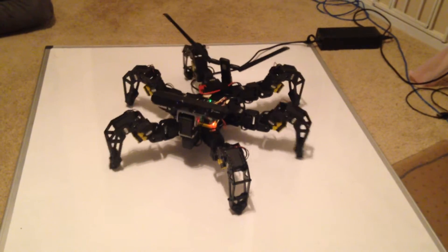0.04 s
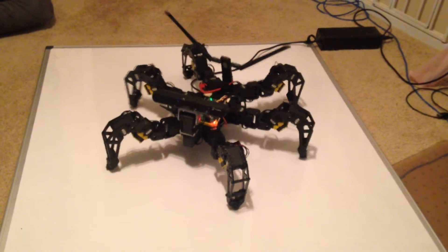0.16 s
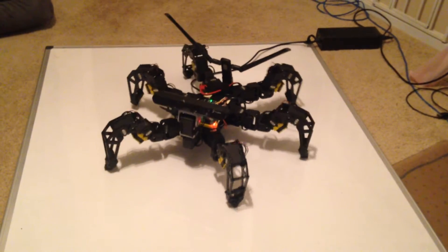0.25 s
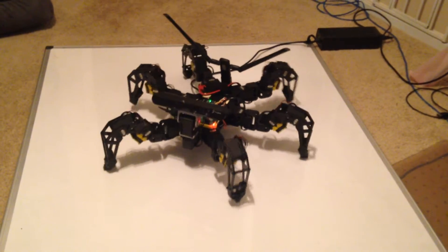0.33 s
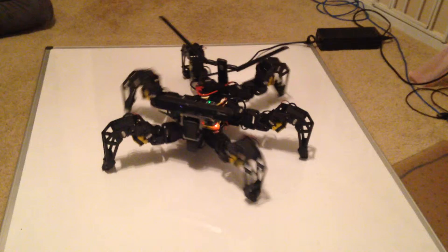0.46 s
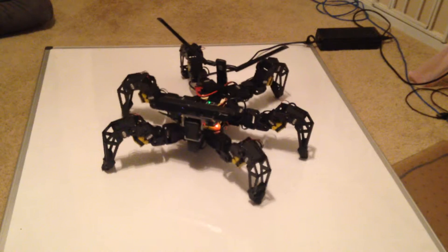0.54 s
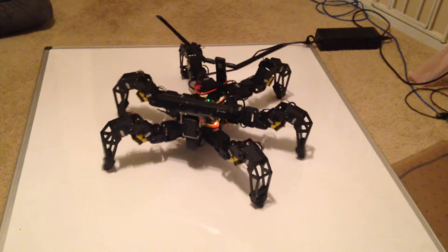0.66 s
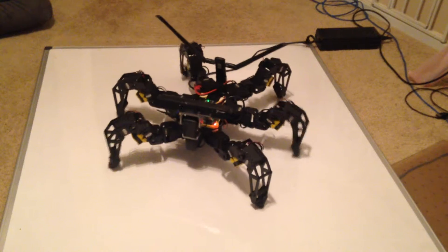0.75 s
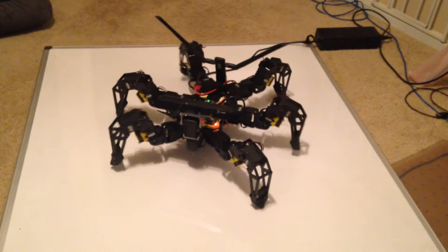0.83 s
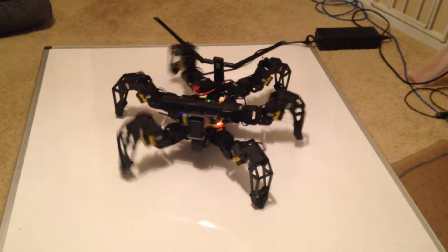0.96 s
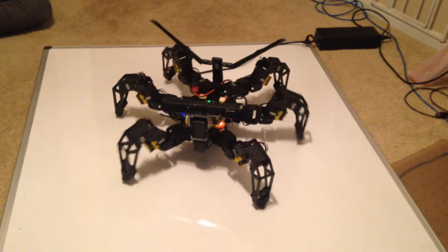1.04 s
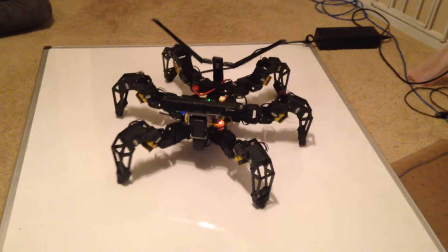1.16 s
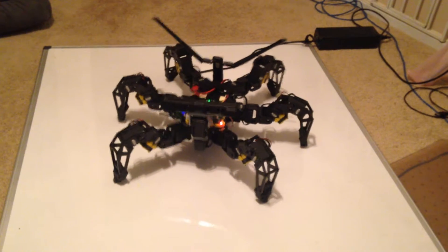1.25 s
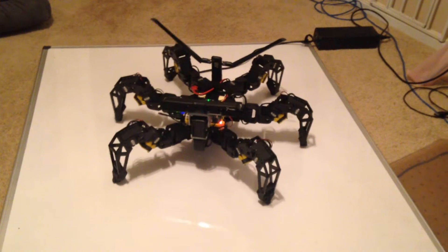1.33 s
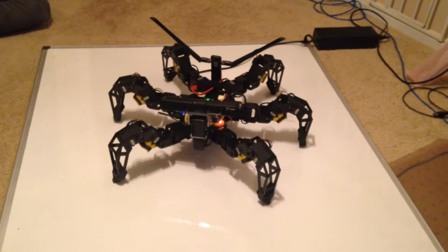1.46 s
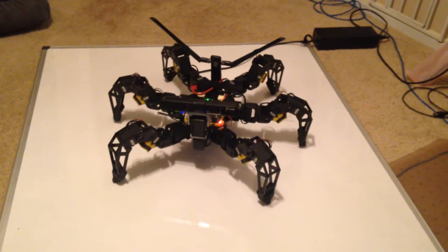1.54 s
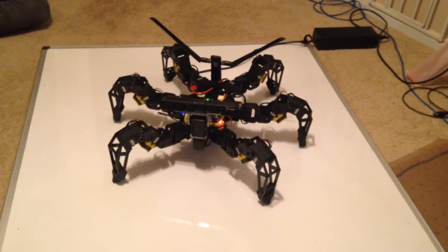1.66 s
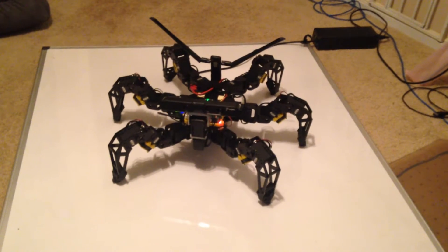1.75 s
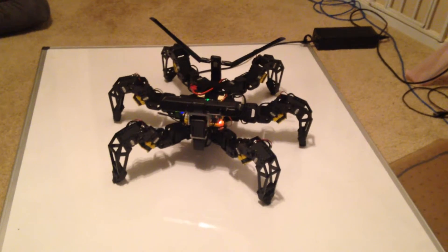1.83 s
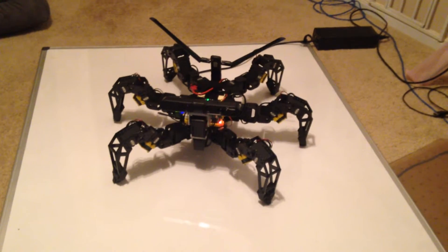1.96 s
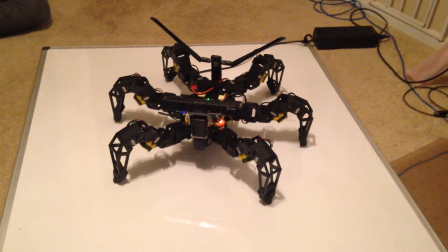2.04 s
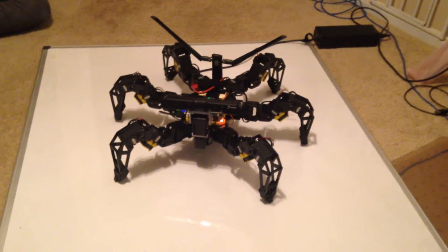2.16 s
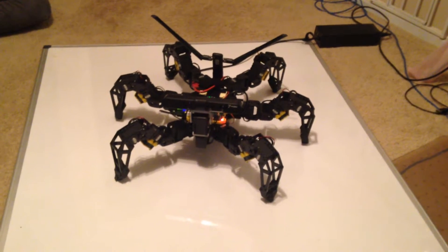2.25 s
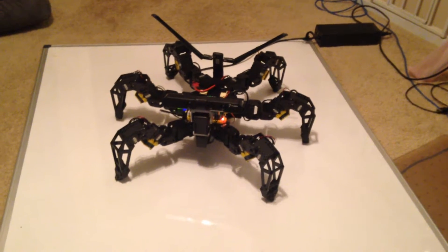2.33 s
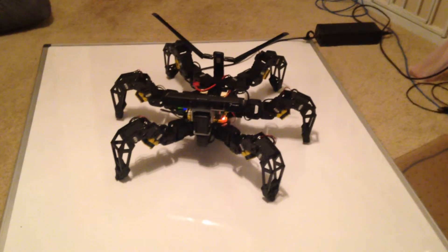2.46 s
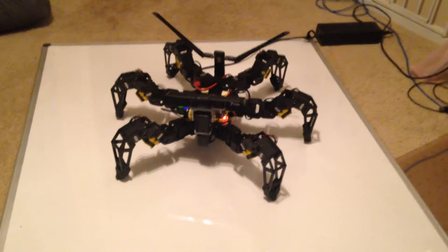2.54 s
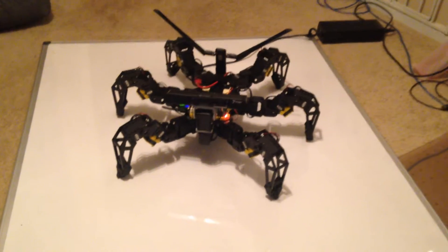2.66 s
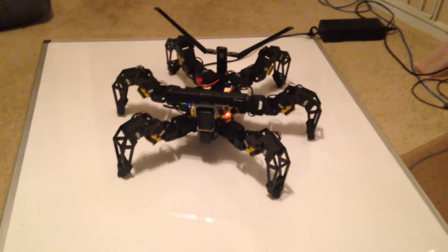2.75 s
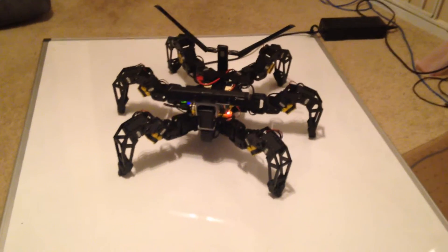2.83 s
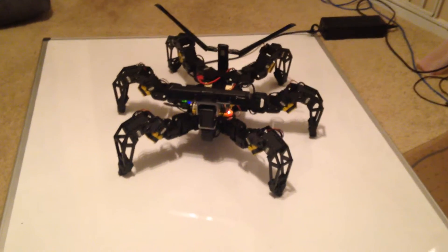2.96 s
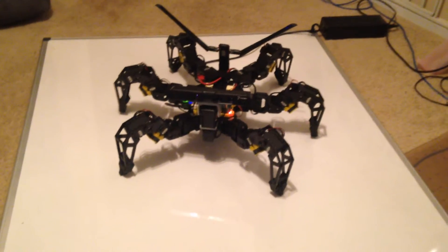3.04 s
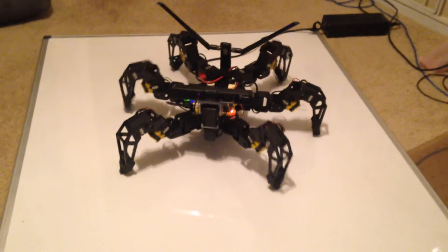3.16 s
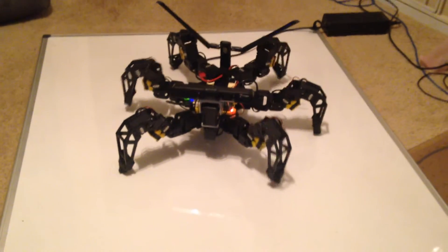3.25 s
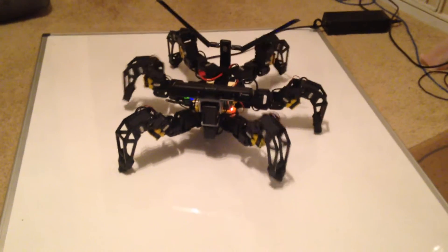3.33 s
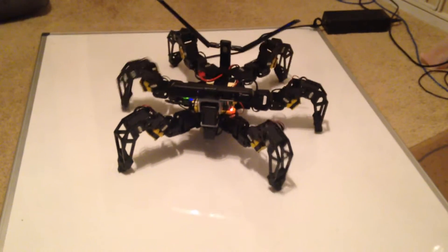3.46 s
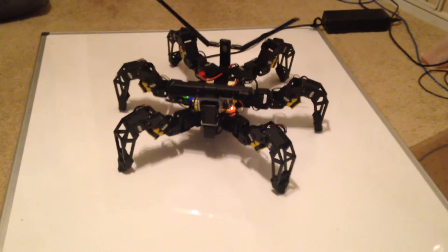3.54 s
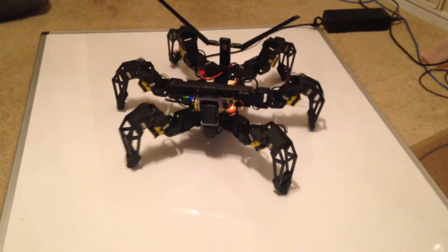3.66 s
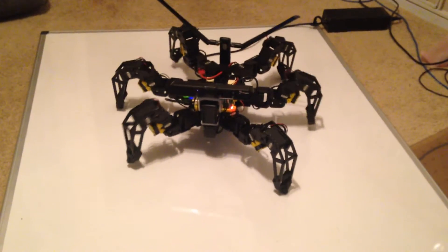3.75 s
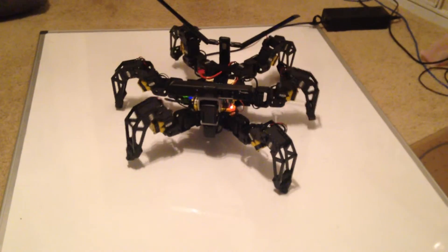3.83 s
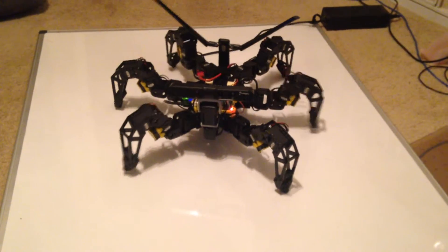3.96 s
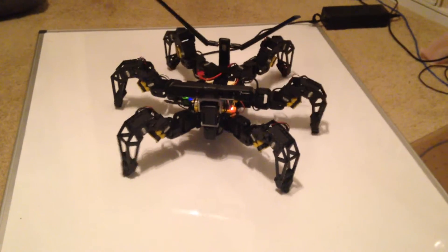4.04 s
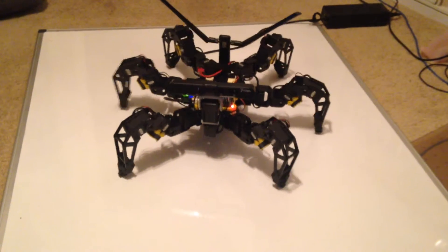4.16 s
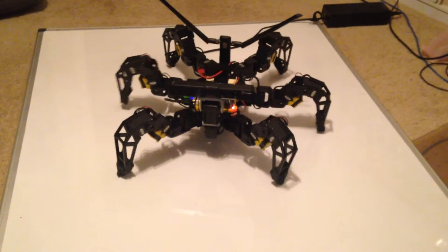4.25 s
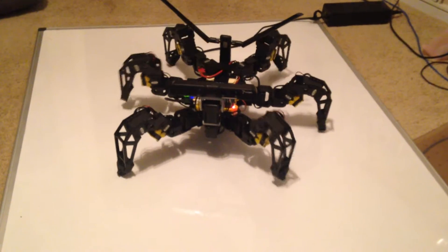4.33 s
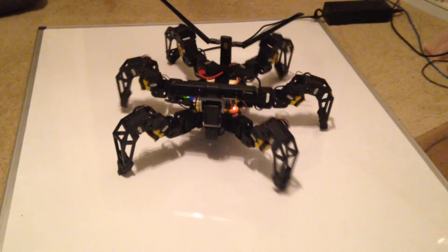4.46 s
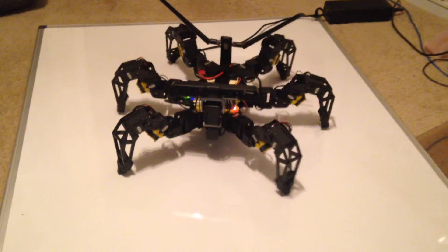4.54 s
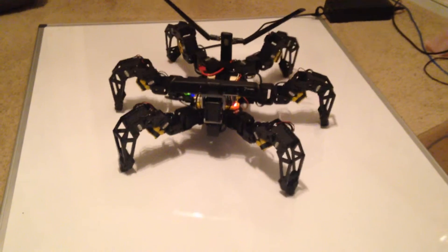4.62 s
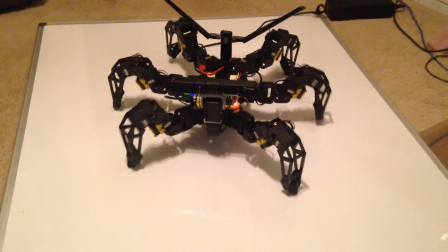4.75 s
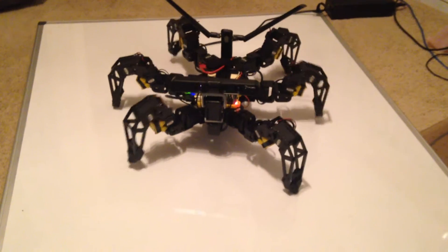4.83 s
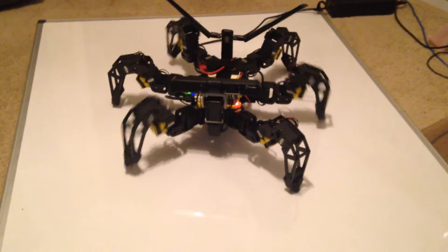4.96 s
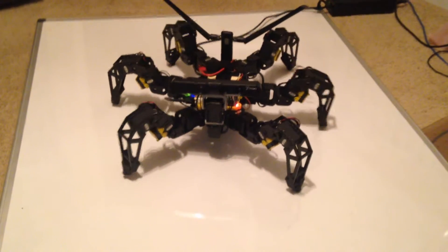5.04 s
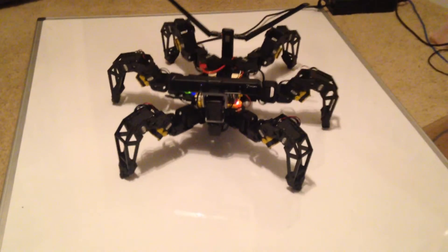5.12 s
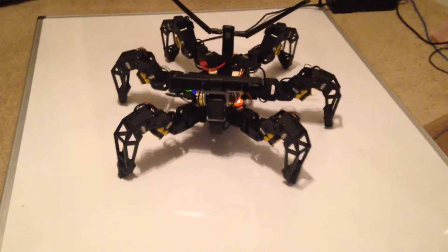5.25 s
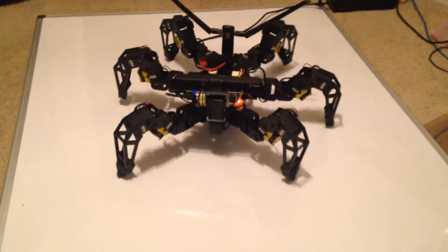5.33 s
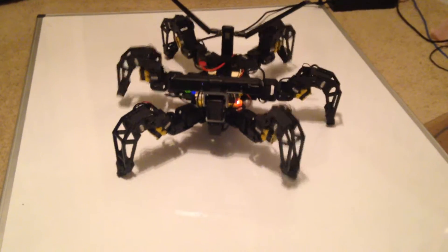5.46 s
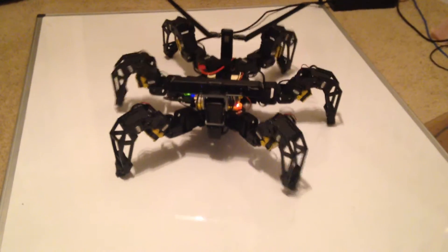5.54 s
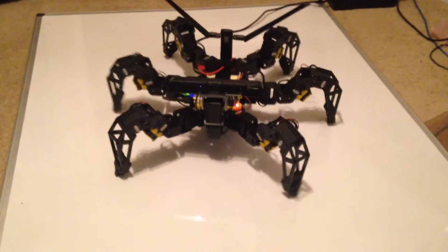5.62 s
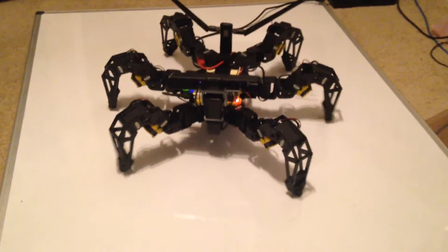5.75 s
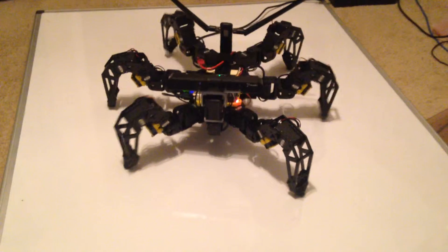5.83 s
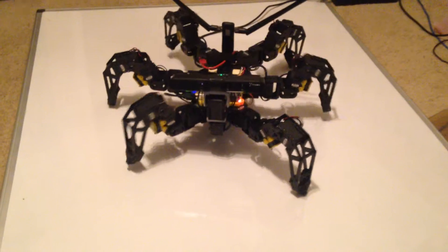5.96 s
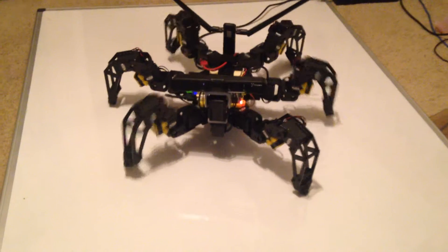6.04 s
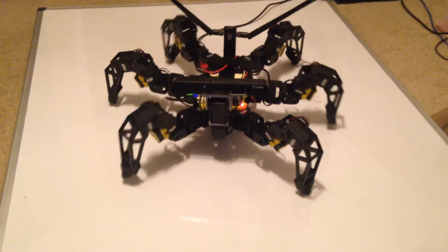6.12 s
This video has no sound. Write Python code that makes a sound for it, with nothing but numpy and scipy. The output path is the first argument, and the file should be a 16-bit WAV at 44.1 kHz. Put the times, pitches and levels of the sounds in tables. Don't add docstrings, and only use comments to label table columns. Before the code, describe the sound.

Servo motors hum, hiss and sing thinly throughout while a legged robot walks on a thin board laid on carpet. Clusters of dull, woody footfalls with plastic clicks and rattles come early, stop for a buzzing pause with a faint sinking drone, then return about every half second with brief stuttering toe scrapes. Small microphone nearby, little deep bass, short room echo.

```python
import sys
import numpy as np
from scipy import signal
from scipy.io import wavfile

SR = 44100
rng = np.random.default_rng(int(sys.argv[2]) if len(sys.argv) > 2 else 0)


def int16_out(signal):
    q = np.round(np.clip(np.atleast_2d(signal).T, -1, 1) * 32767)
    wavfile.write(sys.argv[1], SR, q.astype(np.int16))


def voltage_ratio(decibels):
    exponent = np.asarray(decibels, float) / 20
    return 10 ** exponent


N = 272962


def rms_one(x):
    return x / np.sqrt(np.mean(x ** 2) + 1e-20)


def in_time(rows):
    s, *columns = np.transpose(rows)
    return [np.interp(np.arange(N) / SR, s, column) for column in columns]


def drift(rate):
    r = np.exp(-80 * np.pi * rate / SR)
    white = rng.standard_normal(N // 40 + 2002)
    slow = signal.lfilter([1], [1, -2 * r, r * r], white)[2000:]
    return np.interp(np.arange(N) / 40, np.arange(len(slow)), rms_one(slow))


def highpass(x, order, hz):
    return signal.sosfilt(signal.butter(order, hz, "high", fs=SR, output="sos"), x)


def resonance(x, hz, width_hz):
    r = np.exp(-np.pi * width_hz / SR)
    top = np.array([1, 0, -1]) * (1 - r * r) / 2
    bottom = [1, -2 * r * np.cos(2 * np.pi * hz / SR), r * r]
    return signal.lfilter(top, bottom, x)


def hiss(spectrum, patchy_db, grain_db):
    hz, level_db = np.transpose(spectrum)
    band_count = round(4 * np.log2(hz[-1] / hz[0]))
    edges = np.geomspace(hz[0], hz[-1], band_count + 1)
    white = rng.standard_normal((2, N)) * voltage_ratio(grain_db * drift(230))
    out = np.zeros(N)
    for k, (low, high) in enumerate(zip(edges, edges[1:])):
        band = signal.sosfilt(signal.butter(2, [low, high], "band", fs=SR, output="sos"), white[k % 2])
        band_db = np.interp(np.log(low * high) / 2, np.log(hz), level_db)
        out += band * voltage_ratio(band_db + patchy_db * drift(27))
    return rms_one(out)


def rings(table, t60_s, rise_s):
    out, t = np.zeros(N + SR), np.arange(SR // 10) / SR
    for s, peak_db, hz in table:
        at = round(s * SR)
        envelope = voltage_ratio(peak_db - 60 * t / t60_s) * (1 - np.exp(-t / rise_s))
        out[at:at + len(t)] += envelope * np.sin(2 * np.pi * hz * t)
    return out[:N]


# pitch_hz, level_db (per Hz)
IDLE_COLOR = [(30, -25), (90, 1), (150, -8.5), (290, -17.5), (900, -14.5), (1500, -14.5), (2600, -14),
              (3500, -6.5), (4400, -11.5), (5700, -24.5), (7200, -21), (10500, -33), (13000, -45),
              (15800, -21)]


def servo_hiss():
    return voltage_ratio(-49 - 2.5) * hiss(IDLE_COLOR, patchy_db=0.64, grain_db=-0.84)


# time_s, pitch_hz, level_db (rms)
MOTOR_TONES = [
    [(0, 1066, -65), (1.0, 1060, -63), (2.2, 1076, -64), (3.2, 1074, -61), (4, 1070, -65), (4.6, 1062, -67),
     (5.5, 1058, -63), (6.19, 1054, -65)],
    [(0, 1116, -72), (1.0, 1113, -68), (1.8, 1123, -63), (2.7, 1105, -64), (3.4, 1098, -63),
     (4.0, 1108, -66), (4.7, 1118, -65), (6.19, 1114, -71)],
    [(0, 1192, -72), (1.2, 1193, -72), (1.5, 1194, -64.5), (3.1, 1194, -64), (3.5, 1190, -68),
     (4.5, 1191, -69), (6.19, 1192, -63)],
    [(0, 960, -80), (1.2, 962, -70), (1.9, 970, -84), (2.7, 986, -70), (3.3, 993, -65), (3.8, 986, -68),
     (4.1, 975, -80), (5, 968, -69), (6.19, 966, -67)],
    [(0, 1085, -82), (2.3, 1088, -80), (3.0, 1088, -66), (4.3, 1085, -72), (5.2, 1086, -67),
     (6.19, 1082, -72)],
]
OCTAVE_DB = [-4.5, -13, -5.5, -19, -5]


def whines():
    out = np.zeros(N)
    for rows, over_db in zip(MOTOR_TONES, OCTAVE_DB):
        hz, level_db = in_time(rows)
        phase = 2 * np.pi * np.cumsum(hz + 1.5 * drift(8)) / SR
        wobble_db = 1.8 * drift(7)
        tone = np.sin(phase) + voltage_ratio(over_db) * np.sin(2 * phase)
        out += np.sqrt(2) * voltage_ratio(level_db + wobble_db) * tone
    return voltage_ratio(0.36) * out


# pitch_hz, unsteadiness_hz, level_db (rms)
SERVO_BUZZ = [(82.6, 5.3, -63), (194, 1.02, -61.5), (238.5, 1.56, -61.5), (388, 1.86, -68),
              (432, 2.12, -69.5), (444, 3.82, -69), (925, 3.4, -100)]
# pitch_hz, unsteadiness_hz, level_db (rms)
BEATING_PAIR = [(215.2, .3, -54.5), (222.3, .3, -55.5)]
# time_s, level_db
HOLDING_EFFORT = [(0, -6), (0.6, -8), (0.9, -6), (1.02, -14), (1.14, -5), (1.24, -6), (1.3, -1), (1.7, -4),
                  (2.0, -2.5), (2.5, -2), (2.9, -3), (3.28, -1.5), (3.34, -7), (4.0, -6), (4.5, -7),
                  (5.0, -8), (5.6, -8), (6.19, -4.5)]
IN_STEP_S, CLOSING_HZ_PER_S = 2.47, .9


def buzz():
    out = np.zeros(N)
    sink_hz = CLOSING_HZ_PER_S * np.clip(np.arange(N) / SR - IN_STEP_S, -1, 1)
    upper_hz = BEATING_PAIR[1][0]
    for hz, wander_hz, level_db in SERVO_BUZZ + BEATING_PAIR:
        gain = np.sqrt(2) * voltage_ratio(level_db + 1.5 * drift(8))
        rate = hz - sink_hz * (hz == upper_hz) + wander_hz * drift(4.63)
        turns = np.cumsum(rate) / SR
        out += gain * np.sin(2 * np.pi * (turns - turns[round(IN_STEP_S * SR)]))
    return voltage_ratio(in_time(HOLDING_EFFORT)[0]) * out


def rumble():
    dull = rms_one(resonance(resonance(rng.standard_normal(N), 62, 40), 62, 40))
    return voltage_ratio(-65.5 + 0.5 * drift(2.9)) * dull


# time_s, pitch_hz, level_db (rms)
FAR_ENGINE = [
    (0, 90, -83),
    (1.3, 121, -78),
    (1.55, 120.9, -57),
    (1.76, 108, -59),
    (1.92, 99.7, -63),
    (2.03, 88, -60),
    (2.39, 86.2, -62),
    (2.46, 86.8, -75),
    (6.19, 85, -80),
]


def drone():
    hz, level_db = in_time(FAR_ENGINE)
    return np.sqrt(2) * voltage_ratio(level_db) * np.sin(2 * np.pi * np.cumsum(hz) / SR)


# middle_s, effort_db, half_length_s, drive_whine_db (above effort)
LEG_STROKES = [(0.075, -51, 0.065, 1.5), (0.184, -49.5, 0.048, 0), (0.31, -51, 0.049, 3),
               (0.48, -52.5, 0.061, 3.5), (0.624, -49.5, 0.046, 1), (0.718, -49, 0.055, 0.5),
               (0.871, -49, 0.053, 2), (1.018, -53.5, 0.097, 4.5), (1.125, -49.5, 0.055, 0),
               (1.26, -48.5, 0.088, -6), (1.373, -51.5, 0.023, 5.5), (1.47, -50.5, 0.038, -1),
               (3.28, -49.5, 0.029, 3), (3.367, -54.5, 0.087, 1.5), (3.517, -51, 0.049, 3),
               (3.628, -47, 0.04, -2), (3.8, -49, 0.075, 2), (4.089, -51, 0.11, 2), (4.163, -50, 0.027, -2),
               (4.298, -53, 0.039, 9), (4.453, -53.5, 0.056, 4), (4.567, -51, 0.045, 2),
               (4.671, -48, 0.046, -0.5), (4.845, -50.5, 0.1, 0.5), (5.113, -50, 0.065, 1.5),
               (5.221, -47.5, 0.055, -1.5), (5.37, -49, 0.035, 5), (5.516, -53, 0.079, 4),
               (5.718, -51.5, 0.088, -1), (5.94, -49, 0.027, 5.5)]
FINAL_STROKE = (6.5, -48.5, 0.56, -0.5)
REST_WHIR_DB, REST_DRIVE_DB = -58, -58


def effort():
    t = np.arange(N) / SR
    whir, drive = voltage_ratio(REST_WHIR_DB) ** 2, voltage_ratio(REST_DRIVE_DB) ** 2
    for s, effort_db, half_s, whine_db in LEG_STROKES + [FINAL_STROKE]:
        power = voltage_ratio(effort_db) ** 2 * np.exp(-((t - s) / half_s) ** 2)
        whir = whir + power
        drive = drive + power * voltage_ratio(whine_db) ** 2
    return np.sqrt(whir), np.sqrt(drive)


# pitch_hz, level_db (per Hz)
GEAR_COLOR = [(1500, -6.5), (2500, -2.5), (3500, 1), (5200, -4), (7200, -0.5), (10000, -8), (12000, -4),
              (16000, -23)]
# pitch_hz, level_db (per Hz)
DRIVE_COLOR = [(9000, -39), (11500, -40), (13000, -11.5), (14500, 8), (15500, 21), (16500, -3)]


def leg_swings():
    whir, drive = effort()
    gears = whir * hiss(GEAR_COLOR, patchy_db=1.0, grain_db=1.5)
    return gears + drive * hiss(DRIVE_COLOR, patchy_db=3.0, grain_db=1.5)


# start_s, peak_db, treble_db
JOINT_TICKS = [(0.0743, -34, -1), (0.1586, -42, -9), (0.595, -40, -7), (0.6802, -33.5, -17),
               (0.717, -36, -21), (1.037, -42, -9), (1.13, -38.5, 8), (1.216, -42, 6), (1.2672, -29.5, -14),
               (1.255, -44, 2), (1.554, -46, -18), (0.114, -46, 2), (3.249, -43, -7), (3.5562, -39, -9),
               (3.6125, -32.5, -16), (3.7655, -39, -15), (3.888, -42, 1), (4.064, -38.5, -13),
               (4.104, -39, -2), (4.1488, -27.5, -24), (4.6622, -33.5, -19), (4.782, -53, -14),
               (4.807, -41, -16), (5.1235, -38, -13), (5.2046, -29.5, -20), (5.3332, -44, -9),
               (5.448, -50, -16), (5.7618, -41, -12), (5.754, -42, -16), (5.945, -40, 1)]
# pitch_hz, width_hz, level_db
TOE_SHELL = [(2140, 910, -6), (3540, 1450, 1), (6560, 970, -2.5), (9400, 7200, -14)]


def ticks():
    low, top, t = np.zeros(N + SR), np.zeros(N + SR), np.arange(SR // 20) / SR
    for s, peak_db, top_db in JOINT_TICKS:
        fade = voltage_ratio(-60 * t / .013) + voltage_ratio(-13 - 60 * t / .05)
        crack = voltage_ratio(peak_db) * fade * rng.standard_normal((2, len(t)))
        at = round(s * SR)
        low[at:at + len(t)] += crack[0]
        top[at:at + len(t)] += crack[1] * voltage_ratio(top_db)
    shell = sum(voltage_ratio(level_db) * resonance(low, hz, width_hz) for hz, width_hz, level_db in TOE_SHELL)
    return (voltage_ratio(3.5) * shell + voltage_ratio(-0.5) * resonance(top, 10800, 6000))[:N]


NUDGE_TIMES = [0.143, 0.205, 0.745, 0.772, 0.836, 1.2, 1.215, 1.225, 1.355, 1.49, 3.246, 3.25, 3.262, 3.272,
               3.29, 3.292, 3.312, 3.527, 3.618, 3.722, 4.136, 4.176, 4.27, 4.305, 4.645, 4.76, 5.338,
               5.345, 5.35, 5.372, 5.41, 5.77, 5.83, 5.898]
# peak_db, pitch_hz
NUDGE_SOUNDS = [(-32, 130), (-38, 600), (-40, 265), (-44, 170), (-33, 240), (-37, 130), (-28, 105),
                (-29, 275), (-40, 130), (-43, 224), (-44, 760), (-46, 590), (-33, 150), (-34, 297),
                (-48, 650), (-32, 306), (-39, 310), (-44, 150), (-27, 204), (-42, 195), (-31, 150),
                (-29, 263), (-34, 198), (-42, 220), (-38, 170), (-47, 440), (-34, 196), (-36, 400),
                (-41, 620), (-34, 170), (-44, 286), (-29, 145), (-45, 150), (-37, 207)]


def nudges():
    return rings(np.column_stack([NUDGE_TIMES, NUDGE_SOUNDS]), t60_s=0.07, rise_s=0.0024)


# start_s, peak_db, flex_hz, boom_db, knock_db
FOOT_LANDINGS = [(0.152, -13, 176, -10, -6), (0.168, -19, 162, -16, -2.5), (0.6163, -13.5, 186, -13, -6.5),
                 (0.627, -40, 153, -13, 10), (0.676, -19, 163, -14, -19), (0.705, -18, 244, -22, -28),
                 (1.209, -13.5, 174, -7, -5.5), (1.223, -24.5, 151, -6, -5), (1.262, -18.5, 188, -17, -13),
                 (3.534, -19, 137, -11, -1.5), (3.6085, -12.5, 190, -9.5, -5.5),
                 (4.144, -8, 174, -16, -11.5), (4.149, -12.5, 210, -9, -16), (4.614, -30.5, 218, -12, -8),
                 (4.6538, -17, 197, -12.5, -18), (4.659, -17, 200, -23, -18), (5.191, -27.5, 210, -10, -4),
                 (5.201, -22, 195, -19, -4.5), (5.219, -15.5, 142, -12.5, -13),
                 (5.726, -29, 214, -8.5, -19), (5.751, -24.5, 160, -15, -2)]
# start_s, peak_db, flex_hz, boom_db
FOOT_REBOUNDS = [(0.199, -25, 244, -16), (0.278, -26, 188, -26), (0.643, -24, 304, -25),
                 (0.657, -21, 183, -30), (0.741, -34, 194, -25), (0.773, -33, 151, -21),
                 (0.834, -43, 230, -15), (1.23, -24, 149, -19), (1.357, -40.5, 151, -0.5),
                 (1.488, -37, 220, -15), (1.558, -45.5, 220, -1), (3.641, -21, 195, -15),
                 (3.755, -35.5, 213, -32), (4.178, -28, 203, -2), (4.197, -32, 181, -15),
                 (4.309, -31, 200, -30), (4.671, -21.5, 161, -14), (4.687, -28, 200, -17),
                 (4.827, -38.5, 215, -9), (5.251, -26, 170, -13), (5.373, -28.5, 179, -16),
                 (5.613, -39.5, 194, -12), (5.742, -26.5, 168, -8), (5.769, -30, 140, -17),
                 (5.828, -35, 150, -18), (5.895, -40, 203, -23), (0.181, -22, 170, -22),
                 (0.214, -24, 180, -19), (0.294, -28.5, 150, -24), (0.714, -24.5, 234, -32),
                 (1.2432, -24, 149, -22), (1.284, -37, 150, -11), (4.175, -28, 150, -15),
                 (4.696, -40, 190, -19), (5.762, -31.5, 150, -7), (0.689, -21.5, 146, -17),
                 (4.192, -29, 150, -9), (1.272, -26.5, 192, -10)]
REBOUND_KNOCK_DB, DULLING = -15.5, 0.45
SNAP_DB, SNAP_FOLLOWS, SNAP_HARD = -18, 0.24, 0.049


def strikes():
    rows = list(FOOT_LANDINGS)
    for row in FOOT_REBOUNDS:
        rows.append((*row, REBOUND_KNOCK_DB + DULLING * (row[1] + 24)))
    return [(*row, SNAP_DB + SNAP_FOLLOWS * row[-1] + SNAP_HARD * (row[1] + 16)) for row in rows]


def modes(table, t):
    hz, level_db, t60 = np.transpose(table)[:, :, None]
    luck = rng.standard_normal((2, len(table), 1))
    strength_db, detune = 2.5 * luck[0], .02 * luck[1]
    fade = voltage_ratio(level_db + strength_db - 60 * t / t60)
    return np.sum(fade * np.sin(2 * np.pi * hz * (1 + detune) * t), axis=0)


def crowded(outline, count):
    hz, level_db, t60 = np.transpose(outline)
    place = (np.arange(count) + rng.random(count)) / count
    at = np.log(hz[0]) + np.log(hz[-1] / hz[0]) * place
    levels = np.interp(at, np.log(hz), level_db)
    return np.transpose([np.exp(at), levels, np.interp(at, np.log(hz), t60)])


# pitch_hz, level_db, t60_s
BOARD_BOOM = [(62.4, -39.5, 0.17), (106, -21, 0.13), (118.4, 10.5, 0.27), (134.8, 9, 0.19)]
# pitch_hz, level_db, t60_s
BOARD_BODY = [(161, 3.5, 0.054), (183, 6.5, 0.09), (208.5, -30, 0.067), (231, 7.5, 0.17), (307, 1.5, 0.21)]
# pitch_hz, level_db, t60_s
KNOCK_OUTLINE = [(277.9, 7, 0.15), (397, 0.5, 0.17), (516, 6.5, 0.096), (1006.5, -18.5, 0.36)]
# pitch_hz, level_db, t60_s
SNAP_OUTLINE = [(820, -3, 0.16), (1100, 18.5, 0.013), (1430, -4, 0.14), (2010, -4, 0.22),
                (2818, -22, 0.095)]
BLOW_DELAY_S = .0035
CLAMP_S = .055


def footfalls():
    out, t = np.zeros(N + SR), np.arange(SR // 3) / SR
    for s, peak_db, flex_hz, boom_db, knock_db, snap_db in strikes():
        slowness_db = np.clip(-.6 * (peak_db + 20) - .4 * min(knock_db + 14, 0), 0, 16)
        rise_s = .0009 * voltage_ratio(slowness_db)
        rise = 1 - np.exp(-t / rise_s)
        turns = flex_hz * t + .4 * (1 - np.exp(-t / .0011))
        flex = np.sin(2 * np.pi * turns - np.pi) * rise * np.exp(-(t / 0.0096) ** 2)
        swell = (1 - np.exp(-t / 0.0015)) * np.exp(-(t / CLAMP_S) ** 2)
        ring = voltage_ratio(-19) * modes(BOARD_BODY, t) + voltage_ratio(boom_db - 8.0) * modes(BOARD_BOOM, t)
        knock = voltage_ratio(knock_db - 21.0) * modes(crowded(KNOCK_OUTLINE, count=20), t) * rise
        wave_front = -np.sin(2 * np.pi * 410 * t) * np.exp(-(t / 0.0023) ** 2)
        knock += voltage_ratio(knock_db + 4.0) * wave_front
        snap = voltage_ratio(snap_db - 19.5) * modes(crowded(SNAP_OUTLINE, count=16), t)
        snap *= 1 - np.exp(-2 * t / rise_s)
        at = round((s + BLOW_DELAY_S) * SR)
        out[at:at + len(t)] += voltage_ratio(peak_db) * (voltage_ratio(-2.5) * flex + swell * ring + knock + snap)
    return highpass(out[:N], 2, 75)


RATTLE_DB, RATTLE_FOLLOWS, RATTLE_T60_S = -26.5, 0.38, 0.12


def rattle():
    envelope, t = np.zeros(N + SR), np.arange(SR // 4) / SR
    for s, peak_db, flex_hz, boom_db, knock_db in FOOT_LANDINGS:
        at = round((s + BLOW_DELAY_S) * SR)
        start_db = peak_db + RATTLE_DB + RATTLE_FOLLOWS * knock_db
        envelope[at:at + len(t)] += voltage_ratio(start_db - 60 * t / RATTLE_T60_S)
    return envelope[:N] * rms_one(resonance(rng.standard_normal(N), 900, 1730))


# start_s, peak_db, pitch_hz
LEG_CLACKS = [(0.157, -39, 900), (0.159, -33, 694), (0.171, -38, 1505), (0.622, -28.5, 940),
              (1.265, -40, 950), (3.538, -48, 590), (3.536, -34, 990), (3.613, -41, 980),
              (4.147, -26, 1160), (4.151, -25.5, 898), (4.153, -30, 1330), (4.159, -36, 1950),
              (4.661, -42, 980), (5.755, -39, 1050), (3.537, -43, 1700), (3.538, -51, 2300),
              (3.613, -39, 1645), (3.612, -48, 2270), (4.149, -36, 2300), (4.15, -37, 1600),
              (5.755, -42, 1500), (5.76, -48, 1890), (5.205, -35, 720), (3.233, -31, 343),
              (0.168, -36, 640), (0.196, -37, 620), (1.212, -45, 1780), (0.712, -39, 1050),
              (5.761, -40, 1150), (5.762, -43, 1500), (4.168, -40, 1900), (4.16, -34, 620),
              (0.175, -40, 980), (1.222, -42, 1300), (5.222, -38, 380), (0.71, -40, 540),
              (5.7535, -36, 620)]


def leg_rings():
    return rings(LEG_CLACKS, t60_s=0.042, rise_s=0.0012)


# start_s, peak_db, pitch_hz
HOUSE_BUMPS = [(0.29, -40, 70), (0.897, -39, 76), (1.1, -38, 57.7), (1.92, -38, 62), (2.68, -40, 60),
               (2.928, -35, 65.5), (3.27, -40, 66), (3.899, -64, 51.1), (4.892, -39, 78),
               (5.079, -49, 73.3), (5.33, -44, 65), (5.893, -33, 67.4)]


def thuds():
    out, t = np.zeros(N + SR), np.arange(SR // 3) / SR
    for s, peak_db, hz in HOUSE_BUMPS:
        at = round(s * SR)
        swell = t / 0.036 * np.exp(-t / 0.012)
        out[at:at + len(t)] += voltage_ratio(peak_db + 9.5) * swell * np.sin(2 * np.pi * hz * t)
    return out[:N]


# strongest_s, level_db (rms), slips_hz (settled), fade_s, richness_db (multiples)
TOE_SLIDES = [
    (0.342, -33.5, 122, 0.057, -0.5),
    (4.331, -44, 121, 0.074, -9),
    (4.809, -41, 226, 0.026, -20),
    (5.357, -28.5, 128, 0.024, -3.5),
    (5.429, -43.5, 129, 0.074, 2),
]
TOE_SKIDS = [
    (3.251, -26, 146.6, 0.035, 2),
    (4.283, -33, 133.7, 0.0267, 0),
]
SECOND_DB, SECOND_LAG_S, UPPER_DB, UPPER_LAG_S = -11, 0.02, -15, 0.015
GRIP_SHARE, GLIDE_S = 0.95, 0.0122
LINGER = 1.07


def slides():
    out, t = np.zeros(N), np.arange(N) / SR
    rub = rms_one(resonance(resonance(rng.standard_normal(N), 260, 540), 260, 540))
    # first slip rate over settled, share of lag, second_db, upper_db
    rows = [(*row, 1.03, -0.47, 5, -4.5) for row in TOE_SLIDES]
    rows += [(*row, 1.4, 1, 0, 0) for row in TOE_SKIDS]
    for s, level_db, last_hz, fade_s, rich_db, ratio, late, second_db, upper_db in rows:
        grip_s = GRIP_SHARE * fade_s

        def grip(lag_s, linger):
            after = t - s - lag_s
            fall = np.where(t < s + lag_s, (after / grip_s) ** 2, after / fade_s / linger)
            return voltage_ratio(level_db - 20 * fall)

        settling = np.exp(-np.clip(t - s + grip_s, 0, 9) / GLIDE_S)
        rate = last_hz + (ratio - 1) * last_hz * settling
        phase = 2 * np.pi * np.cumsum(rate * (1 + .03 * drift(60))) / SR
        upper = voltage_ratio(-9.5) * rub
        for k, share in zip(range(3, 7), (0.99, 0.25, 0.34, 0.05)):
            uneven = voltage_ratio(3 * drift(30))
            upper = upper + uneven * share * np.sin(k * phase)
        first = grip(0, 0.8) * np.sin(phase)
        second = grip(late * SECOND_LAG_S, LINGER) * np.sin(2 * phase + 1.2)
        upper = grip(late * UPPER_LAG_S, LINGER) * upper
        multiples = voltage_ratio(SECOND_DB + second_db + rich_db) * second + voltage_ratio(UPPER_DB + upper_db + rich_db) * upper
        out += np.sqrt(2) * (first + multiples)
    return out


ROOM_T60_S, WALL_CUT_HZ = 0.38, 11000


def room(x):
    out, dull = np.zeros(N), np.exp(-2 * np.pi * WALL_CUT_HZ / SR)
    lags = (rng.uniform(.015, .045, size=10) * SR).astype(int)
    for k, lag in enumerate(lags):
        loop, gain, state = x.copy(), voltage_ratio(-60 * lag / SR / ROOM_T60_S), [0.]
        for i in range(lag, N, lag):
            back, state = signal.lfilter([gain * (1 - dull)], [1, -dull], loop[i - lag:i], zi=state)
            loop[i:i + lag] += back[:N - i]
        out += (loop - x) * (-1) ** k
    return out


def scene():
    steady = servo_hiss() + whines() + buzz() + rumble() + drone() + thuds()
    blows = ticks() + nudges() + footfalls() + leg_rings() + slides()
    echoes = voltage_ratio(-19.5) * room(highpass(blows, 1, 220))
    return (steady + leg_swings() + blows + echoes + rattle())[None]


def low_pass(x):
    return signal.sosfilt(signal.butter(12, 16360, fs=SR, output="sos"), x)


def record(dry):
    return low_pass(highpass(dry, 1, 40))


dry = scene()
out = record(dry)
int16_out(out)
```